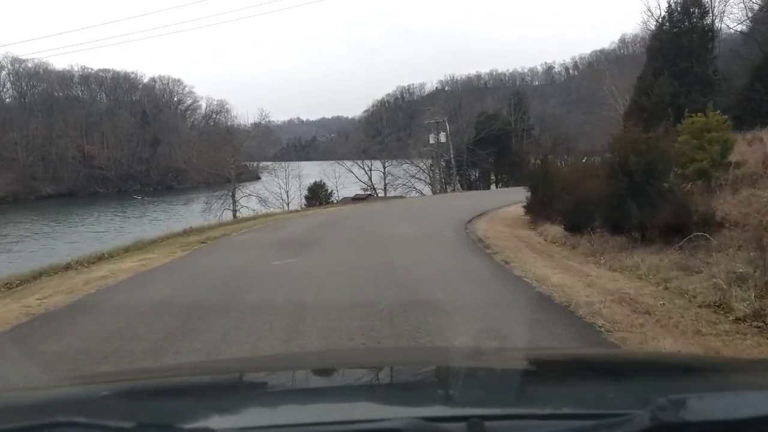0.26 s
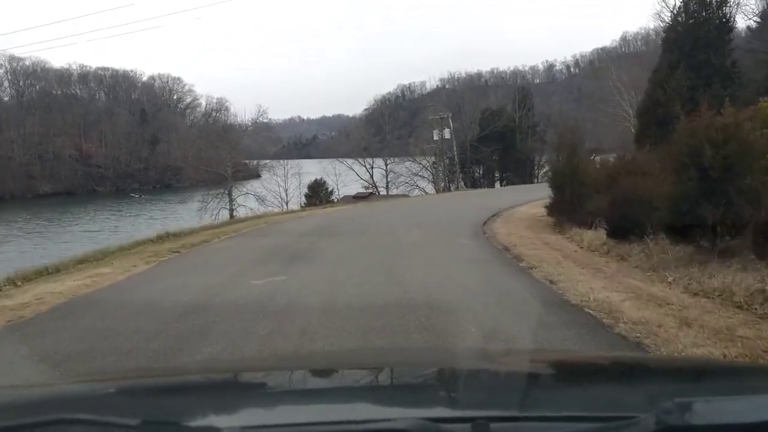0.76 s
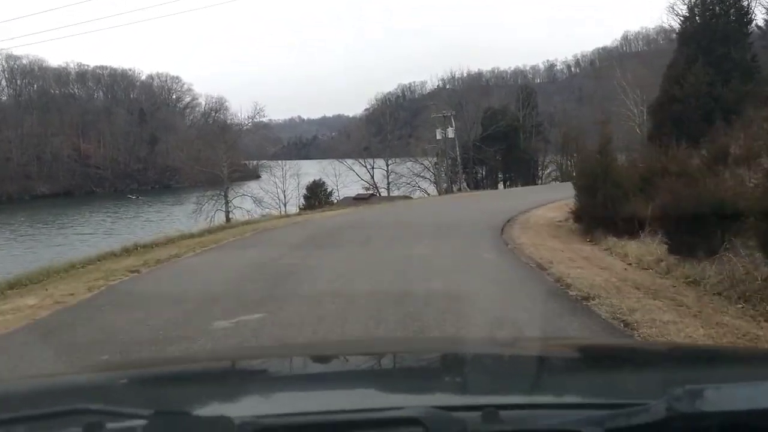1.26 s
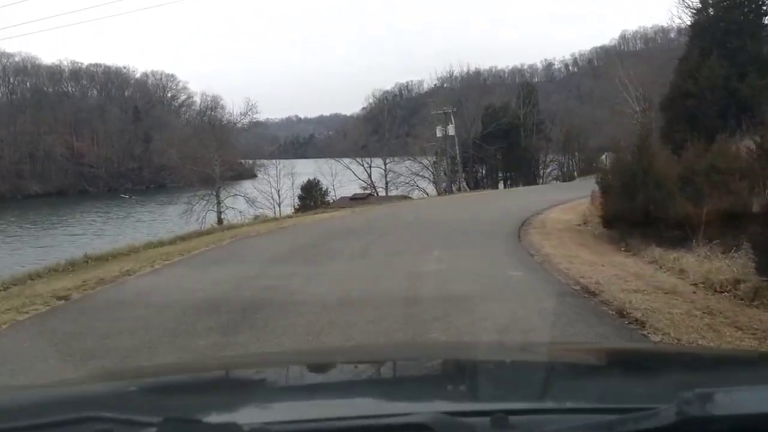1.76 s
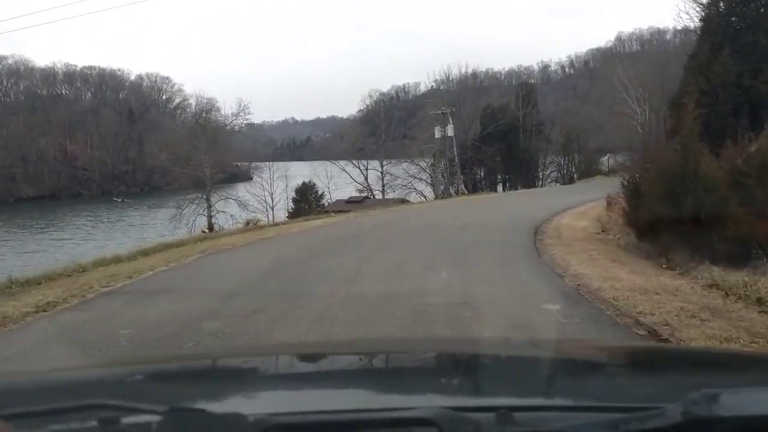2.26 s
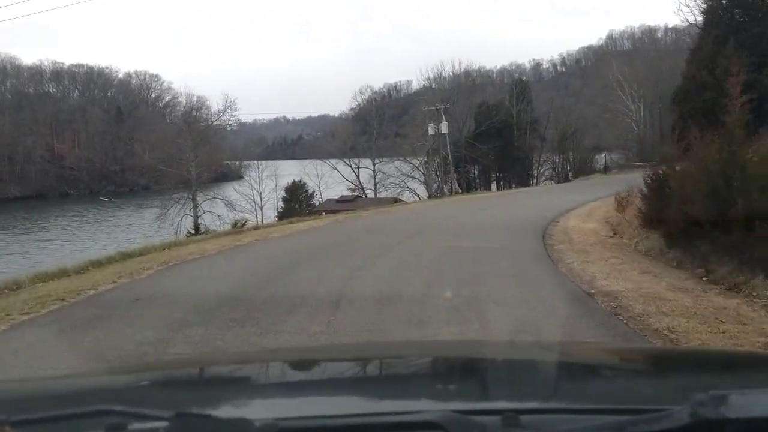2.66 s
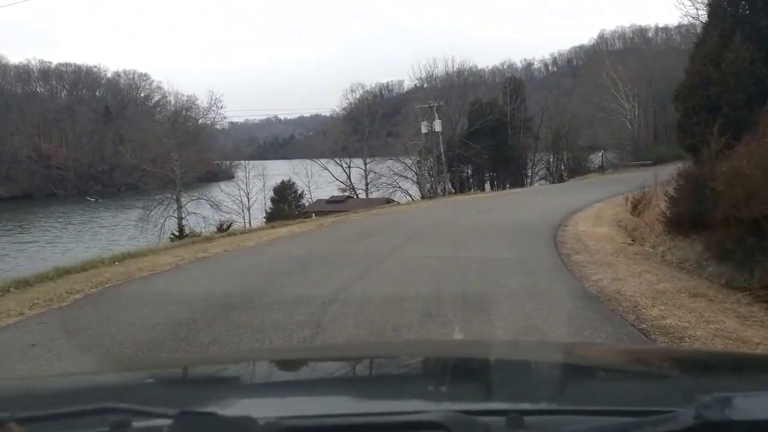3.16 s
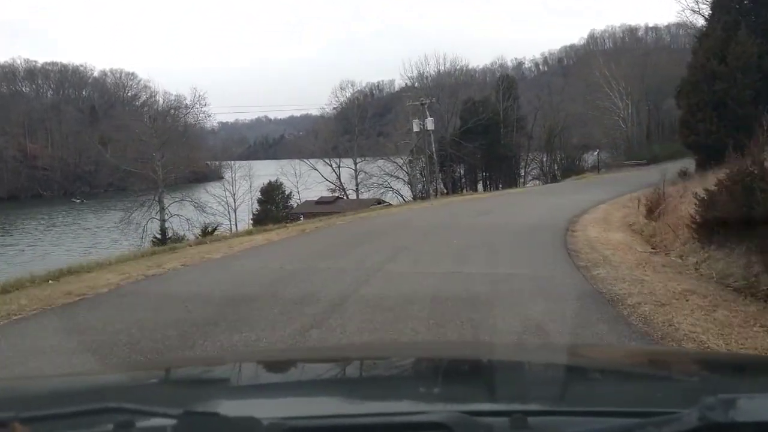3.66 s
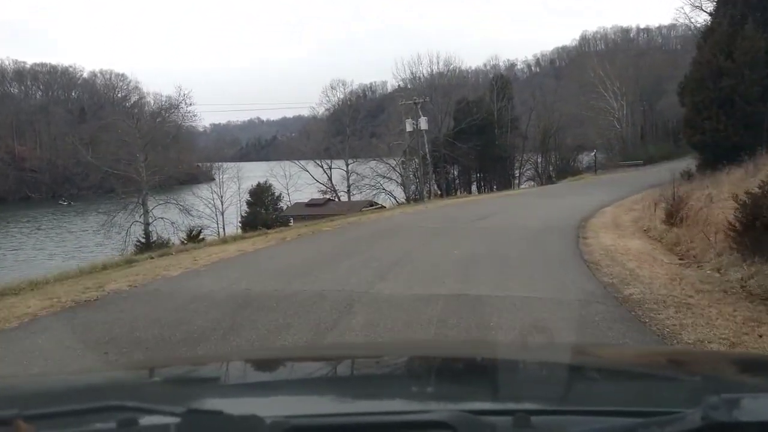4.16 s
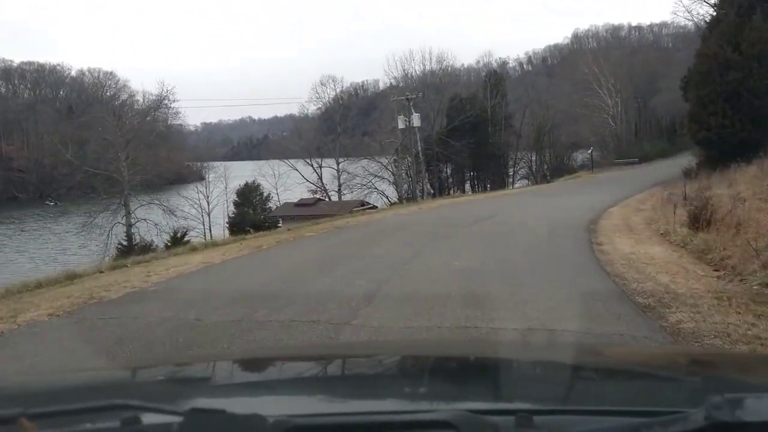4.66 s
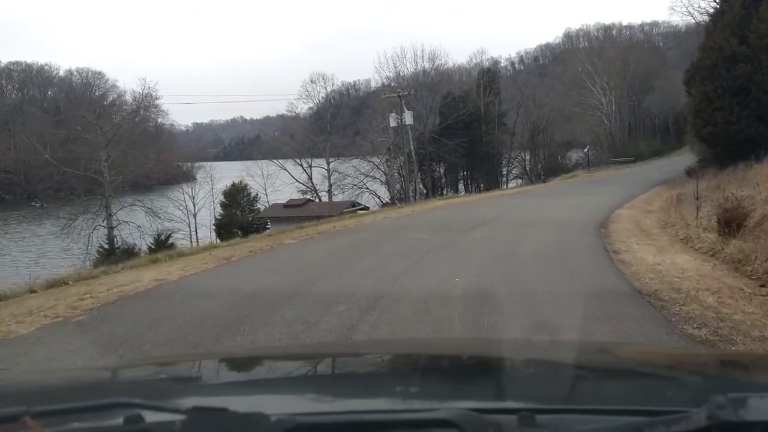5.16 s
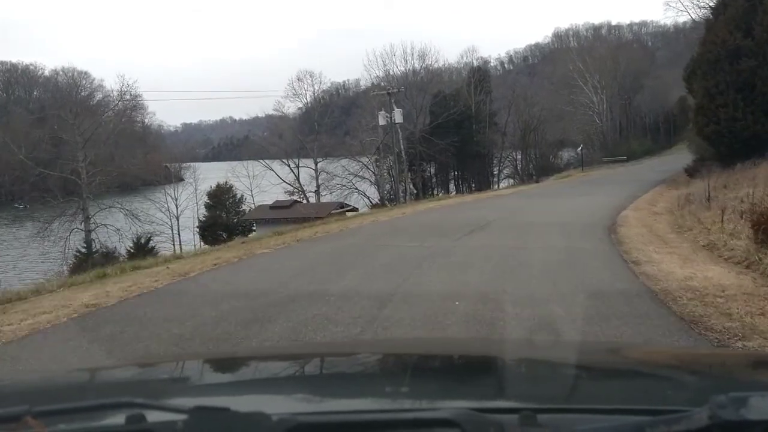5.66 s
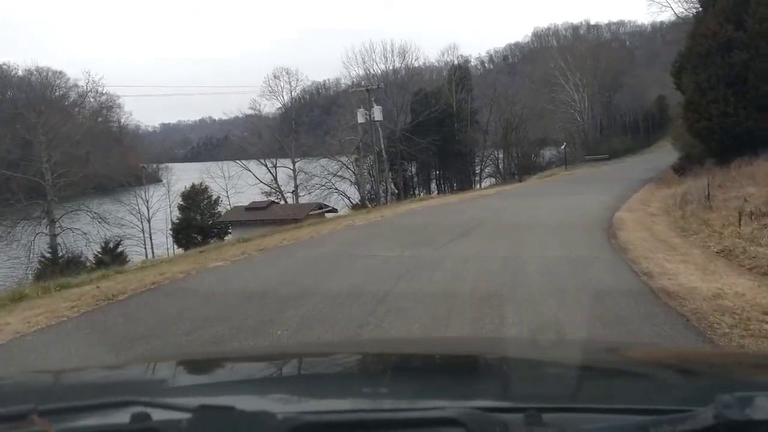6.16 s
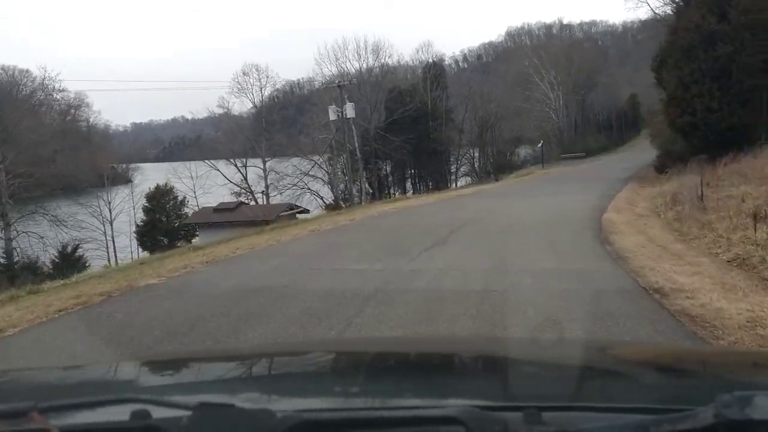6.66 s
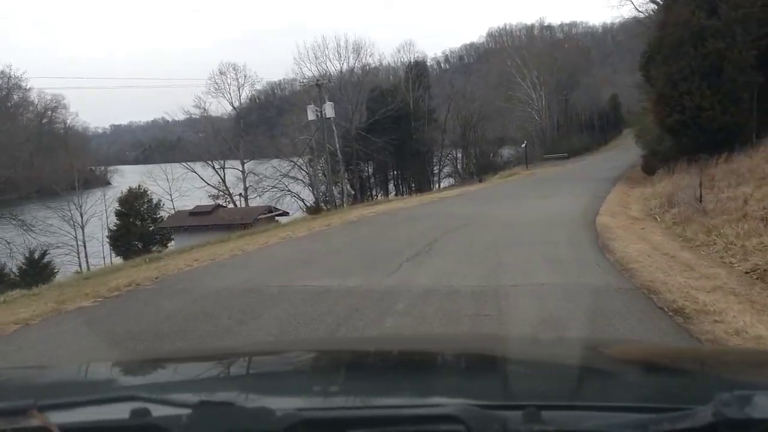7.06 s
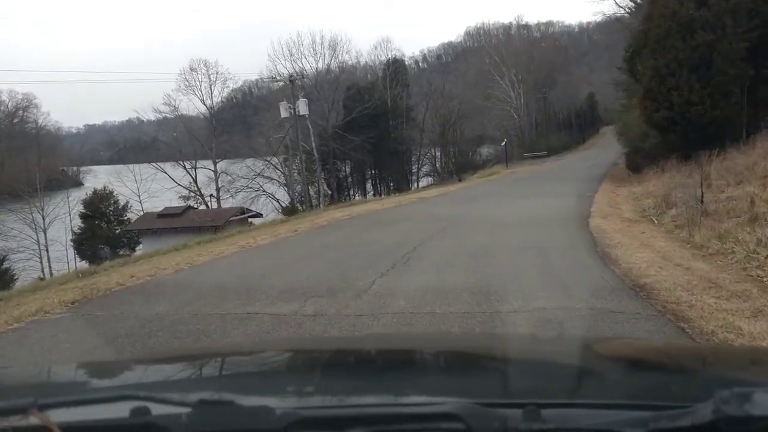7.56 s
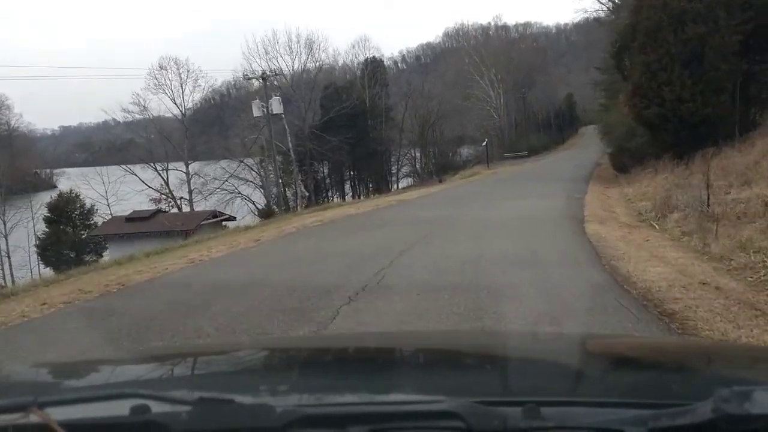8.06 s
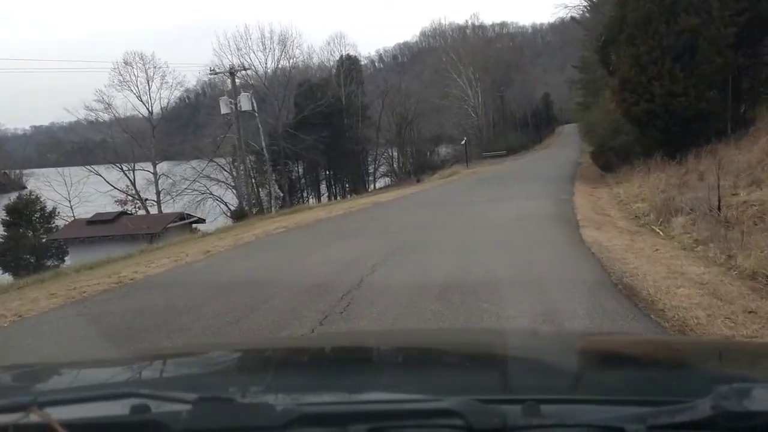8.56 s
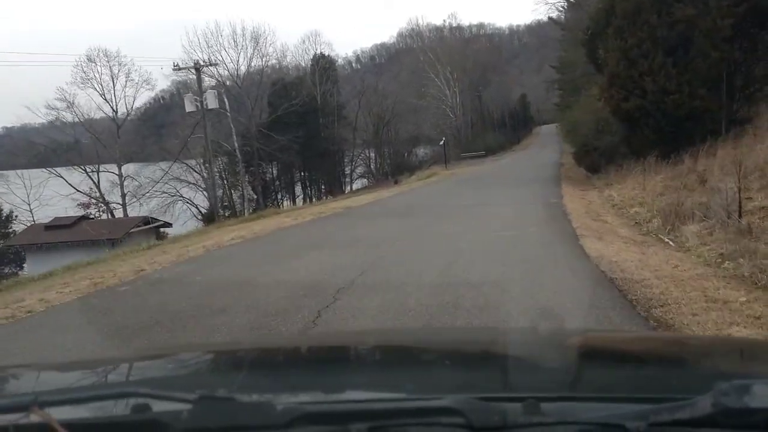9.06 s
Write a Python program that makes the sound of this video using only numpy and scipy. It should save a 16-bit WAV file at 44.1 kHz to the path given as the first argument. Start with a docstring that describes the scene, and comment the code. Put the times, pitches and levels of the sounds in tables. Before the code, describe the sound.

Quiet boomy car cabin on a park road: dull thumps early on, later a clunk, a short electric window whirr with rubbing seal, and a closing knock.

```python
"""Window moving in a slow car

Inside a car rolling slowly, the cabin booms with road noise, front and rear wheels jolt over a patch and trim ticks.
A window motor starts with a clunk, drags the glass through its seal and stops; air comes in through the gap.
Shaped noise makes rumble, rubbing and draught; struck resonances make knocks and ticks; sines make the motor hum.
Two microphone ports a hand apart hear the door from the left."""
import sys
import numpy as np
from scipy import signal
from scipy.fft import rfft, irfft, next_fast_len
from scipy.io import wavfile
from scipy.ndimage import uniform_filter1d, map_coordinates

SR = 44100
rng = np.random.default_rng(int(sys.argv[2]) if len(sys.argv) > 2 else 0)


def bounce(signal):
    """Save signal as a 16-bit WAV file at the path given by the first command-line argument."""
    frames = np.transpose(np.atleast_2d(signal))
    limited = np.clip(frames, -1, 1)
    pcm = np.round(limited * 32767).astype(np.int16)
    wavfile.write(sys.argv[1], SR, pcm)


N = 410130

# Steady road rumble: (time [s], level [dB])
ROAD_LEVEL = [(0.0, -48), (0.3, -52.5), (0.9, -51.5), (1.4, -50.5), (2.0, -53), (2.9, -53.5), (3.5, -55.5),
              (4.5, -57), (5.3, -57), (5.7, -51), (6.3, -53), (7.0, -52.5), (7.4, -54), (7.9, -49),
              (8.3, -55), (9.3, -55)]
# Relative spectrum of the cabin rumble: (frequency [Hz], density [dB per Hz])
CABIN_SPECTRUM = [(13, -59), (22, -21.5), (31, -7), (45, -1.5), (75, -1.5), (118, -3.5), (156, -10),
                  (190, -9.5), (232, -6), (338, -16), (493, -20.5), (680, -23.5), (860, -32), (1100, -33),
                  (2500, -46), (3250, -52), (5500, -120)]
# Likeness of the two ports in the cabin: (frequency [Hz], correlation [0-1])
CABIN_ALIKE = [(30, .998), (48, .99), (75, .9), (130, .96), (290, .88), (640, .6), (1400, .55), (3000, .4)]
# Jolts from the road, then from the door as the window starts and stops:
# (time [s], length [s], floor pan boom [dB], air mode [dB], body panels [dB], rattle [dB])
JOLTS = [(0.086, 0.013, -53, -56, -51.5, -76), (0.87, 0.098, -47.5, -47.5, -55.5, -74),
         (0.97, 0.018, -37, -43.5, -44.5, -66), (1.027, 0.041, -43, -47, -50.5, -67.5),
         (1.096, 0.059, -40.5, -50.5, -45, -60), (1.442, 0.059, -47.5, -54, -57, -74),
         (1.54, 0.036, -38, -46, -39.5, -62.5), (1.653, 0.049, -31.5, -33, -41, -60.5),
         (1.741, 0.038, -34.5, -49, -42, -60), (1.802, 0.069, -42, -48.5, -44.5, -56.5),
         (2.034, 0.016, -55.5, -56, -59.5, -75), (2.188, 0.013, -67, -57, -55.5, -72),
         (2.348, 0.048, -65, -51.5, -59, -78), (2.71, 0.015, -53, -67, -58.5, -78),
         (3.208, 0.024, -63, -51.5, -63.5, -87), (3.377, 0.18, -61, -56, -66.5, -78),
         (3.951, 0.051, -52.5, -59, -63, -82), (4.25, 0.032, -63, -50.5, -62, -80),
         (5.359, .03, -51, -48, -77, -82), (5.423, 0.025, -47, -43.5, -48, -56.5),
         (5.513, 0.085, -45.5, -50.5, -50, -55.5), (6.413, 0.027, -49, -63, -67, -82),
         (7.938, 0.059, -51, -56, -54, -65), (8.014, 0.022, -49, -51, -41, -59),
         (8.078, 0.02, -60, -51, -49, -55)]
# Relative spectrum of the floor pan: (frequency [Hz], density [dB per Hz])
BOOM_SPECTRUM = [(15, -42), (25, -2.5), (53, 4), (97, 4), (140, 0.5), (190, -13.5), (300, -70)]
# Relative spectrum of the body panels: (frequency [Hz], density [dB per Hz])
BODY_SPECTRUM = [(110, -34), (170, 3.5), (240, 5), (310, -0.5), (400, -10), (520, -9.5), (800, -17.5),
                 (1300, -27), (2200, -79)]
# Relative spectrum of loose trim: (frequency [Hz], density [dB per Hz])
RATTLE_SPECTRUM = [(530, -33), (900, -2.5), (1560, -3.5), (2000, -8.5), (3000, -16), (3600, -14),
                   (7000, -52), (10000, -34), (14000, -58)]
# Dull blows: (time [s], nominal peak [dB], pitch struck [Hz], brightness [dB], t60 of the push [s])
KNOCKS = [(0.943, -43, 500, -2, 0.12), (0.977, -29, 110, -48, 0.052), (1.097, -36.5, 231, -18, 0.087),
          (1.528, -29.5, 367, -15, 0.15), (1.53, -39.5, 1030, -10, 0.051), (1.647, -18.5, 136, -40, 0.053),
          (1.66, -23.5, 231, -40, 0.092), (1.677, -19, 135, -51, 0.09), (1.704, -29, 298, -41, .08),
          (1.738, -21, 160, -53, 0.061), (1.765, -24, 135, -44, 0.092), (3.397, -36.5, 410, -32, 0.093),
          (5.391, -45.5, 334, -11, 0.11), (5.431, -30, 390, -14, 0.1), (5.437, -35, 598, -20, 0.069),
          (5.49, -45, 776, -8, 0.16), (5.541, -37.5, 269, 6, 0.076), (5.566, -37, 236, -7, 0.26),
          (8.015, -27.5, 377, -18, 0.14), (8.084, -30.5, 480, -18, 0.14)]
# Door panel resonances before scatter: (frequency [Hz], width [Hz], strength [dB])
PANEL_MODES = [(131, 43, 8.5), (251, 43, -2), (379, 97, 5), (472, 96, -2), (602, 52, -4), (776, 63, -4.5),
               (970, 210, -1.5)]
# Trim ticks: (time [s], nominal peak [dB], pitch struck [Hz], upper middle [dB], treble [dB],
# t60 of the push [s])
TICKS = [(0.945, -61.5, 1800, -20, -28, .09), (0.998, -62, 1550, -19, -34, .05),
         (1.07, -59.5, 2780, -20, -11, .044), (1.1049, -65, 2500, -18, -40, 0.04),
         (1.138, -54, 2390, -5, -19, 0.057), (1.1962, -55, 1510, -26, -38, 0.055),
         (1.433, -61.5, 2090, -8, -6, 0.13), (1.4528, -61.5, 3700, -8, -7, 0.075),
         (1.5636, -51.5, 1860, -11, -6, 0.055), (1.655, -57, 2190, -20, -34, .15),
         (1.753, -61, 4200, -5, -13, 0.055), (1.777, -52, 1580, -14, -12, .05),
         (1.7893, -44.5, 2150, -21, -15.5, 0.15), (1.8285, -53, 2400, -14, -34, 0.059),
         (1.863, -51, 2400, -6, -8, 0.03), (1.913, -63, 1500, -12, -33, 0.035),
         (1.944, -59.5, 2040, -12, -24, 0.042), (2.0003, -59, 3700, -10, -9, .12),
         (2.6078, -52.5, 2050, -1, -7, 0.096), (2.6628, -60, 2110, -8, -10, 0.17),
         (2.6824, -56.5, 3600, -15, -7, 0.16), (2.714, -60, 1900, -5, -17, 0.09),
         (3.0784, -58.5, 2070, 1, -10, .094), (3.18, -57, 1650, -6, -3, 0.074),
         (3.214, -62.5, 1920, -8, -9, 0.063), (3.3934, -42, 1890, -14, -8.5, 0.057),
         (3.6968, -60.5, 2770, -11, -8, 0.046), (4.239, -60, 2020, -13, 6, 0.054),
         (4.3194, -52.5, 3100, -6, 3.5, 0.067), (4.388, -62, 4100, -8, 4, .05),
         (4.47, -64, 2050, -8, -9, 0.058), (4.487, -47.5, 1680, -7, -9, 0.069),
         (5.3357, -54.5, 3720, -10, -1, 0.084), (5.3534, -53.5, 1650, -16, -29, .07),
         (5.386, -53.5, 7600, -10, -14, 0.17), (5.3922, -44, 2550, -12, -7, 0.11),
         (5.4145, -52, 1630, -10, -15, 0.2), (5.465, -46.5, 1630, -12, -9, 0.2),
         (5.5373, -48.5, 2150, -17, -27, 0.038), (5.5877, -43, 3200, -10, 0, 0.26),
         (6.7863, -42, 7810, -12, -12, 0.064), (7.189, -61, 1650, -16, -19, 0.065),
         (7.9193, -46.5, 2620, -2, 1, 0.069), (7.9591, -44, 4000, -8, -1, 0.05),
         (8.0128, -48, 2820, -5, -10, 0.081), (8.032, -48.5, 2910, -14, -20, .036),
         (8.0785, -46, 2940, -10, 1, 0.051), (8.0864, -41, 2880, -12, -17, 0.069)]
# Plastic trim resonances before scatter: (frequency [Hz], width [Hz], strength [dB])
TRIM_MODES = [(1600, 440, 5), (1840, 370, 4), (2080, 180, -3.5), (2396, 180, 2), (2940, 330, 0.5),
              (3110, 110, 3), (3390, 130, 4), (3800, 110, 7), (4250, 63, 1.5), (5500, 230, -17),
              (7260, 140, -26), (7850, 140, 3), (8400, 220, -9)]
# Motor hum: (multiple of the shaft rate [x], level [dB])
SHAFT_ORDERS = [(1, -0.5), (2, -15), (3, -21), (10, -23.5)]
# Pane resonances, each passed with the whole set squared: (frequency [Hz], width [Hz], strength [dB])
PANE_MODES = [(2580, 440, 1.5), (2858, 220, 6.5), (3290, 670, -0.5)]
# The pane binds in the seal: (time [s], length [s], squeal [dB], hiss [dB])
CATCHES = [(5.41, .01, -65, -61), (5.543, 0.011, -57, -71), (5.834, .01, -67, -68), (6.204, .01, -66, -79),
           (6.347, 0.029, -69, -63), (6.385, 0.0091, -55.5, -65), (6.8, .006, -55, -66),
           (6.833, 0.0071, -59, -64), (6.997, 0.013, -66, -59), (7.413, .006, -62, -70),
           (7.43, .01, -60.5, -68), (7.97, 0.0045, -59.5, -66), (8.023, .01, -64, -65),
           (8.087, 0.0084, -64, -61.5)]
# Relative spectrum of the felt seal: (frequency [Hz], density [dB per Hz])
SEAL_SPECTRUM = [(700, -47), (1100, -11), (1390, -12), (1800, -12.5), (2150, -16), (3000, -8), (3800, -9),
                 (5500, -9.5), (7700, -9.5), (10000, -14.5), (13800, -22.5), (15500, -45)]
# Relative spectrum of the duller scrape: (frequency [Hz], density [dB per Hz])
DRAG_SPECTRUM = [(700, -40), (1100, -14), (1500, 0), (2000, -5.5), (2600, -42)]
# Tyre roar through the opening: (time [s], level [dB])
ROAR_LEVEL = [(5.45, -47.5), (5.59, -63), (7.41, -65.5), (7.97, -64), (8.6, -70), (9.3, -73.5)]
# Relative spectrum of the tyre roar: (frequency [Hz], density [dB per Hz])
ROAR_SPECTRUM = [(200, -21), (330, -10), (500, -1), (680, -6.5), (950, -2.5), (1100, -34), (1500, -13),
                 (2200, -70)]
# A narrow whirr that climbs and sinks: (time [s], frequency [Hz], level [dB])
WHIRR_GLIDE = [(5.6, 761.5, -69), (6.5, 793, -67.5), (7.4, 877.5, -64), (7.92, 845, -54), (8.1, 826, -54),
               (8.5, 804, -63.5), (9.3, 740, -74)]
# Draught through the opening: (time [s], hiss [dB], slot tone [dB])
DRAUGHT_LEVELS = [(7.9, -79, -79), (8.074, -66.5, -82), (8.242, -70.5, -77.5), (8.738, -71.5, -77.5),
                  (9.3, -77.5, -80.5)]
# Relative spectrum of the draught hiss: (frequency [Hz], density [dB per Hz])
DRAUGHT_SPECTRUM = [(880, -18), (1500, 2.5), (1560, -35), (1670, -3), (2420, -5), (2830, -0.5),
                    (3760, -3.5), (4570, -14), (5450, -3.5), (7300, -2), (12400, -13.5), (14800, -22),
                    (15500, -26)]
# The draught sings in the slot; the set is squared: (frequency [Hz], width [Hz], strength [dB])
SLOT_MODES = [(4540, 1200, 13), (7300, 700, -13)]
# Someone shifts in the seat: (time [s], level [dB])
CLOTH_LEVEL = [(0.0, -84), (0.87, -82), (1.11, -77), (1.6, -78), (1.8, -68.5), (1.97, -78.5), (2.6, -77),
               (2.9, -82.5), (3.25, -78), (3.7, -79.5), (4.47, -71), (4.89, -80.5), (5.4, -71)]
# Relative spectrum of the cloth: (frequency [Hz], density [dB per Hz])
CLOTH_SPECTRUM = [(880, -34), (1500, -3), (1580, 1), (1750, 0.5), (2070, -4), (2520, -0.5), (3440, -2.5),
                  (7670, -2), (15500, -13.5)]
# Faint thin tones that come and go: (time [s], length [s], mean frequency [Hz], level [dB])
WHINES = [(0.0, 0.57, 1610, -89.5), (5.948, 0.62, 1392, -84)]
# Relative spectrum of the microphone hiss: (frequency [Hz], density [dB per Hz])
SELF_NOISE_SPECTRUM = [(710, -26), (1200, -11.5), (1800, -6.5), (3100, -15), (8000, -22.5), (14500, -18),
                       (16000, -18)]

# The door's sound reaches the left port first; the rumble comes from a wider arc.
LEAD_S, CABIN_LEAD_S = 0.000422, 0.00031
TOP_HZ = 15500
LEAD_IN = 441  # samples of silence ahead of each blow

JOLT_RISE_DB_S, JOLT_FALL_DB_S = 690, 195
RUMBLE_IN_JOLT_DB = -8  # road rumble relative to the boom
# The air mode relative to the rumble between jolts, its random swing, and its fall after a jolt.
MODE_DB, MODE_SWING_DB, MODE_FALL_DB_S = -13.5, 5, 116

# Noise of each port's own relative to the shared noise; first push relative to the noisy ones.
TICK_APART, TICK_FIRM, KNOCK_FIRM = 1.3, .55, 1.1
THIN_DB = 7  # bottom lost by high ticks for each octave above the lowest trim ring
TRIM_FALL_DB = 24  # loss of ring for each octave away from the pitch struck
# Positive pan is louder on the left; early ticks reach the right port first, later ones the left.
DOOR_FROM_S, SEAT_PAN_DB, DOOR_PAN_DB, PAN_SCATTER_DB = 5.0, 1.5, 5, 5

RUN_S, STOP_S = 5.56, 7.95  # the window travels
SHAFT_HZ, HUM_DB = 78.6, -58  # at middling load
# The load cycles once a turn of the lift gear: period, a heavy moment, swings of level and of shaft rate.
TURN_S, HEAVY_S, LOAD_DB, LOAD_HZ = .635, 5.8, 7.5, 1
SQUEAL_DB, PEAK_S, ARCH_DB = -67, 7.1, 1.5  # the base level rises to twice the arch at the peak
# The hiss sags throughout the slide and eases faster near the end.
HISS_DB, HISS_SAG_DB_S, EASE_S, EASE_DB_S = -59, 1.15, 7.57, 6
CATCH_RISE_DB_S, CATCH_FALL_DB_S = 400, 450
DRAG_DB, DRAG_FADE_DB_S = -65, 22  # a duller scrape that thins out as the pane leaves the seal


def road():
    """Tyres on coarse asphalt excite the cabin; jolts raise the rumble and ring the lengthwise air mode."""
    s, length, boom_db, mode_db = np.transpose(JOLTS)[:4]
    steady = gains(ROAD_LEVEL)[0]
    shaken, = swells(s, length, [boom_db + RUMBLE_IN_JOLT_DB], JOLT_RISE_DB_S, JOLT_FALL_DB_S)
    rung, = swells(s, length, [mode_db], JOLT_RISE_DB_S, MODE_FALL_DB_S)
    rumble_gain = np.hypot(steady, shaken) * amp(0.94 * wobble(11))
    rumble = rumble_gain * rush(shape(CABIN_SPECTRUM), CABIN_ALIKE, CABIN_LEAD_S)
    mode_gain = np.hypot(rung, steady * amp(MODE_DB + MODE_SWING_DB * wobble(8.6)))
    mode = rush(lambda hz: ringing([(116, 22, 0)])(hz) ** 2, [(116, 1.0)], CABIN_LEAD_S)
    return (rumble + mode_gain * mode) * amp([[.4], [-.4]])


def jolts():
    """Each shake booms in the floor pan, drums the body panels and sets loose trim chattering."""
    s, length, boom_db, _, body_db, rattle_db = np.transpose(JOLTS)
    levels_db = [boom_db, body_db, rattle_db]
    boom, body, rattle = swells(s, length, levels_db, JOLT_RISE_DB_S, JOLT_FALL_DB_S)
    low = boom * rush(shape(BOOM_SPECTRUM), CABIN_ALIKE, CABIN_LEAD_S)
    drum_noise = amp(1.7 * wobble(40)) * rush(shape(BODY_SPECTRUM), CABIN_ALIKE, CABIN_LEAD_S)
    chatter = amp(3.2 * wobble(70)) * rush(shape(RATTLE_SPECTRUM), [(2000, .6)], LEAD_S)
    return (low + body * unit(drum_noise) + rattle * unit(chatter)) * amp([[.4], [-.4]])


def knocks():
    """Dull blows ring the door panel's resonances, most strongly near the pitch struck."""
    out = np.zeros((2, N + SR))
    for s, db, pitch_hz, bright_db, t60 in KNOCKS:
        panel = struck(PANEL_MODES, pitch_hz, fall_db=17.0, scatter_db=4.4)
        tilt = shape([(300, -22.0), (850, bright_db + 6.0), (1250, bright_db - 0.5), (2500, -54)])
        knock = blow(t60, 0.00153, 0.27, KNOCK_FIRM, lambda hz: panel(hz) * tilt(hz))
        onset_rms = np.sqrt(np.mean(knock[:, LEAD_IN:LEAD_IN + SR // 50] ** 2))
        start = round(s * SR) - LEAD_IN
        out[:, start:start + knock.shape[1]] += amp(db - 11.5) * knock / onset_rms
    return early(out[:, :N], CABIN_LEAD_S) * amp([[.5], [-.5]])


def ticks():
    """Plastic trim slips and ticks: a noisy crack and the short rings of the part."""
    out = np.zeros((2, N + SR))
    for s, db, pitch_hz, middle_db, treble_db, t60 in TICKS:
        door = s > DOOR_FROM_S
        pan_db = (DOOR_PAN_DB if door else SEAT_PAN_DB) + rng.normal(0, PAN_SCATTER_DB)
        trim = struck(TRIM_MODES, pitch_hz, fall_db=TRIM_FALL_DB, scatter_db=4.0)
        thin_db = THIN_DB * max(np.log2(pitch_hz / TRIM_MODES[0][0]), 0)
        broad = shape([(500, -41), (1000, -16 - thin_db), (2000, -7 - thin_db), (3800, middle_db),
                       (7000, treble_db - 4.5), (11000, treble_db - 13), (15000, treble_db - 25)])
        top = shape([(3500, 0), (5500, treble_db / 2)])

        def crack_and_ring(hz):
            """The broad crack, a quarter cycle turned, plus rings thinned below 1200 Hz."""
            ring = amp(3) * trim(hz) * np.minimum(hz / 1200, 1) ** 2 * top(hz)
            return 1j * broad(hz) + ring

        tick = blow(t60, 0.000907, TICK_APART, TICK_FIRM, crack_and_ring)
        onset_rms = np.sqrt(np.mean(tick[:, LEAD_IN:LEAD_IN + SR // 200] ** 2))
        tick = tick / onset_rms * amp([[pan_db / 2], [-pan_db / 2]])
        # Shift the left port earlier for the door, later for the seat.
        tick[0] = np.roll(tick[0], round(LEAD_S * SR) * (-1 if door else 1))
        start = round(s * SR) - LEAD_IN
        out[:, start:start + tick.shape[1]] += amp(db - 5.0) * tick
    return out[:, :N]


def motor():
    """Shaft orders hum through the door; the cycling load moves speed and strength."""
    load = np.cos(2 * np.pi * (np.arange(N) / SR - HEAVY_S) / TURN_S)
    shaft_hz = (SHAFT_HZ + LOAD_HZ * load) * (1 + 0.01152 * wobble(12))
    phase = 2 * np.pi * np.cumsum(shaft_hz) / SR
    hum = sum(amp(db + 0.33 * wobble(12)) * np.sin(k * phase) for k, db in SHAFT_ORDERS)
    running, = swells([RUN_S], STOP_S - RUN_S, [[HUM_DB]], rise_db_s=600, fall_db_s=300)
    return np.sqrt(2) * running * amp(LOAD_DB * load) * hum * amp([[.3], [-.3]])


def glass():
    """The pane rubs through the felt seal: grainy friction in the pane's resonances and a broad hiss."""
    t = np.arange(N) / SR
    slide_squeal, slide_hiss = swells([RUN_S], STOP_S - RUN_S - .03, [[SQUEAL_DB], [HISS_DB]],
                                      rise_db_s=134, fall_db_s=391)
    s, length, *levels_db = np.transpose(CATCHES)
    catch_squeal, catch_hiss = swells(s, length, levels_db, CATCH_RISE_DB_S, CATCH_FALL_DB_S)
    arch_db = ARCH_DB * (2.0 - np.minimum((t - PEAK_S) ** 2, 2))
    squeal = np.hypot(slide_squeal * amp(arch_db + 0.28 * wobble(9)), catch_squeal)
    sag_db = -HISS_SAG_DB_S * (t - RUN_S) - EASE_DB_S * np.maximum(t - EASE_S, 0)
    hiss = np.hypot(slide_hiss * amp(sag_db), catch_hiss)

    alike = [(1500, 0.71), (3000, 0.2), (7000, 0.016), (12000, 0.084)]
    grain = amp(1.3 * wobble(40) + 1.8 * wobble(200))
    rub = squeal * unit(grain * rush(lambda hz: ringing(PANE_MODES)(hz) ** 2, alike, LEAD_S))
    felt = hiss * patchy(rush(shape(SEAL_SPECTRUM), alike, LEAD_S), depth_db=1.3)
    drag, = swells([RUN_S], 0, [[DRAG_DB]], rise_db_s=153, fall_db_s=DRAG_FADE_DB_S)
    scrape = patchy(rush(shape(DRAG_SPECTRUM), alike, LEAD_S), depth_db=3.0)
    felt += drag * (t < STOP_S) * scrape
    return rub * amp([[1.4], [-1.4]]) + felt * amp([[.4], [-.4]])


def outside():
    """Tyre roar, a narrow whirr and a hissing, singing draught come through the opening."""
    hiss, tone = gains(DRAUGHT_LEVELS)
    roar = gains(ROAR_LEVEL)[0] * rush(shape(ROAR_SPECTRUM), [(700, 0.8)], LEAD_S)
    draught = hiss * patchy(rush(shape(DRAUGHT_SPECTRUM), [(4000, 0.11)], LEAD_S), depth_db=2.5)
    slot = tone * rush(lambda hz: ringing(SLOT_MODES)(hz) ** 2, [(4000, 0.33)], LEAD_S)
    return roar + whirr() + draught + slot


def whirr():
    """Slow noise on a gliding carrier makes a narrow band that follows the pitch."""
    hz = curves(WHIRR_GLIDE)[0]
    phase = 2 * np.pi * (np.cumsum(hz) / SR + np.outer([LEAD_S, 0], hz))
    slow = lambda f: 1 / (1 + (f / 65) ** 2)
    band = rush(slow, [(50, 0.98)]) * np.cos(phase) + rush(slow, [(50, 0.58)]) * np.sin(phase)
    return gains(WHIRR_GLIDE)[1] * band


def quiet():
    """Cloth rustle, the faint tones and the microphone's own hiss."""
    cloth = gains(CLOTH_LEVEL)[0] * patchy(rush(shape(CLOTH_SPECTRUM), [(4000, 0.033)]), depth_db=1.6)
    return cloth + whines() + amp(-81.0) * rush(shape(SELF_NOISE_SPECTRUM), [(4000, .01)])


def whines():
    """Slightly unsteady sines, equal in both ports."""
    out = np.zeros(N)
    for s, length, hz, db in WHINES:
        gain, = swells([s], length, [[db]], rise_db_s=33, fall_db_s=40)
        flutter = amp(1.8 * wobble(15))
        out += gain * flutter * np.sin(2 * np.pi * np.cumsum(hz + 3 * wobble(12)) / SR)
    return np.sqrt(2) * out


def blow(t60, rise_s, apart, firm, response):
    """A firm first push, then dying random ones, through a response; the sound starts LEAD_IN samples in."""
    t = np.maximum(np.arange(SR // 4) - LEAD_IN, 0) / SR
    noise = rng.standard_normal((3, len(t)))
    envelope = amp(-60 * t / max(t60, .005)) * (1 - np.exp(-t / rise_s))
    push = (noise[0] + apart * noise[1:]) * envelope
    push[:, LEAD_IN + round(rise_s * SR)] += firm * np.linalg.norm(push[0])
    return irfft(rfft(push) * response(np.fft.rfftfreq(len(t), 1 / SR)), len(t))


def struck(modes, pitch_hz, fall_db, scatter_db):
    """Modes near the pitch struck ring most; fall_db per octave away, and new strengths each time."""
    hit = []
    for c, w, db in modes:
        away_db = fall_db * abs(np.log2(c / pitch_hz))
        hit.append((c, w, db - away_db + rng.normal(0, scatter_db)))
    return ringing(hit)


def ringing(modes):
    """Causal response of (centre [Hz], width [Hz], strength [dB]) resonances, alternating in sign."""
    def response(f):
        """Sum of the resonances at the frequencies f."""
        return sum((-1) ** k * amp(db) * 1j * f * w / (c * c - f * f + 1j * f * w)
                   for k, (c, w, db) in enumerate(modes))
    return response


def rush(response, alike, lead_s=0):
    """Stereo noise of rms 1; the ports share part of it and the left one leads."""
    m = next_fast_len(N)
    hz = np.fft.rfftfreq(m, 1 / SR)
    turn = np.arccos(np.clip(along(alike, hz), -1, 1)) / 2  # the angle sets the likeness
    real, imaginary = rng.standard_normal((2, 2, len(hz)))
    mid, side = (real + 1j * imaginary) * response(hz) * [np.cos(turn), np.sin(turn)]
    left = (mid + side) * np.exp(2j * np.pi * hz * lead_s)
    return unit(irfft([left, mid - side], m)[:, :N])


def patchy(x, depth_db):
    """Random gain patches, a few hundred Hz wide and tens of ms long."""
    z = signal.stft(x, nperseg=512)[2]
    field = uniform_filter1d(rng.standard_normal(z.shape[1:]), size=7, axis=0)
    field = uniform_filter1d(field, size=8, axis=1)
    return unit(signal.istft(z * amp(depth_db * unit(field)), nperseg=512)[1][:, :N])


def swells(starts, lengths, levels_db, rise_db_s, fall_db_s):
    """Gain curves, one for each column of levels: every event rises, holds and falls."""
    t = np.arange(0, N / SR, .002)
    s = np.asarray(starts)[:, None]
    before = np.maximum(s - t, 0)
    after = np.maximum(t - s - np.reshape(lengths, (-1, 1)), 0)
    form = amp(-rise_db_s * before - fall_db_s * after)
    # Overlapping events add in power.
    return [np.interp(np.arange(N) / SR, t, np.sqrt(amp(c) ** 2 @ form ** 2)) for c in levels_db]


def wobble(rate):
    """A smooth random curve, rate knots a second."""
    coarse = np.arange(0, N + 16, 16)
    knots = rng.standard_normal(int(N * rate / SR) + 4)
    return np.interp(np.arange(N), coarse, map_coordinates(knots, [coarse * rate / SR]))


def curves(rows, beyond=None):
    """One value per sample for each column after the time."""
    s, *cols = np.transpose(rows)
    return [np.interp(np.arange(N) / SR, s, c, beyond, beyond) for c in cols]


def gains(rows):
    """Gain curves from dB columns, fading over 10 ms to silence beyond the table."""
    return [uniform_filter1d(amp(np.minimum(c, 0)), size=441) for c in curves(rows, -140)]


def early(pair, lead_s):
    """The left port hears the sound lead_s before the right one."""
    return np.array([filtered(pair[0], lambda hz: np.exp(2j * np.pi * hz * lead_s)), pair[1]])


def filtered(x, response):
    """x passed through a complex response of frequency."""
    m = next_fast_len(N + SR // 2)
    return irfft(rfft(x, m) * response(np.fft.rfftfreq(m, 1 / SR)), m)[..., :N]


def shape(points):
    """Response of a (frequency [Hz], level [dB]) spectrum."""
    return lambda hz: amp(along(points, hz))


def along(points, hz):
    """Read (frequency [Hz], value) points on a log frequency axis."""
    f, v = np.transpose(points)
    return np.interp(np.log(hz + 1), np.log(f + 1), v)


def amp(db):
    """Decibels to linear gain."""
    return 10 ** (np.asarray(db) / 20)


def unit(x):
    """Scale to an rms of 1."""
    return x / np.sqrt(np.mean(x ** 2) + 1e-20)


def scene():
    """The rolling cabin, its jolts and ticks, the window and the quiet bed add up."""
    return road() + jolts() + knocks() + ticks() + motor() + glass() + outside() + quiet()


def record(dry):
    """A sharp band limit keeps nothing from TOP_HZ upward."""
    return filtered(dry, lambda hz: hz < TOP_HZ)


dry = scene()
out = record(dry)
bounce(out)
```